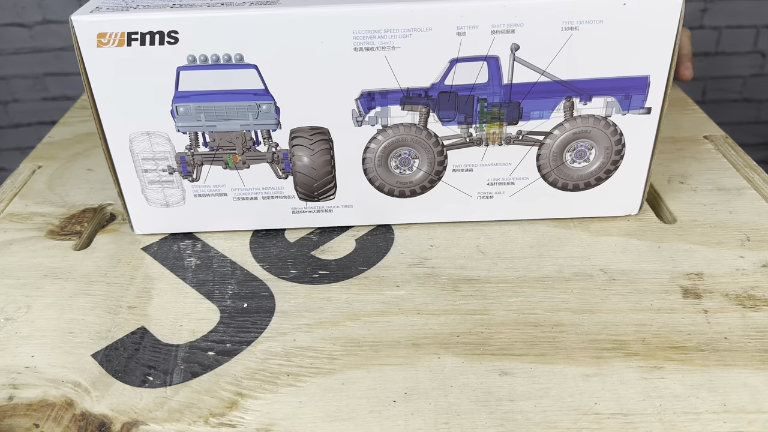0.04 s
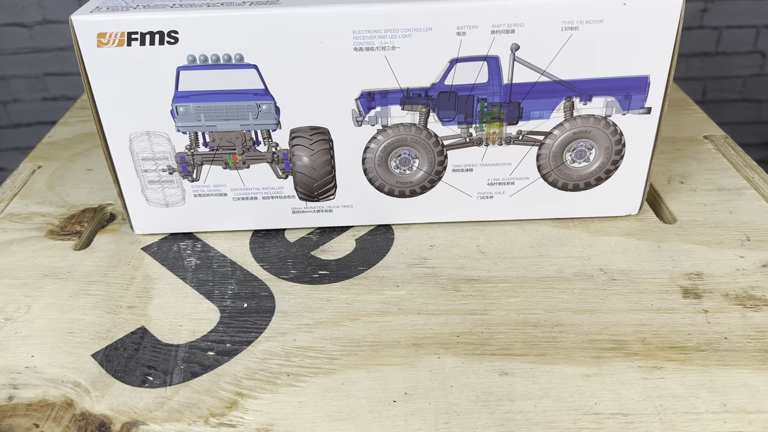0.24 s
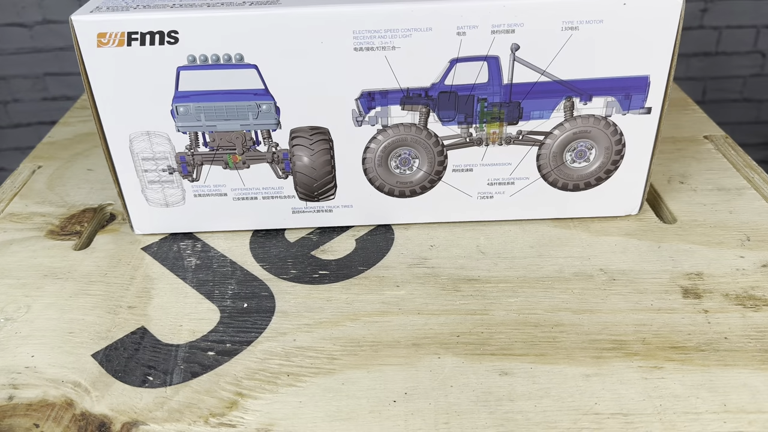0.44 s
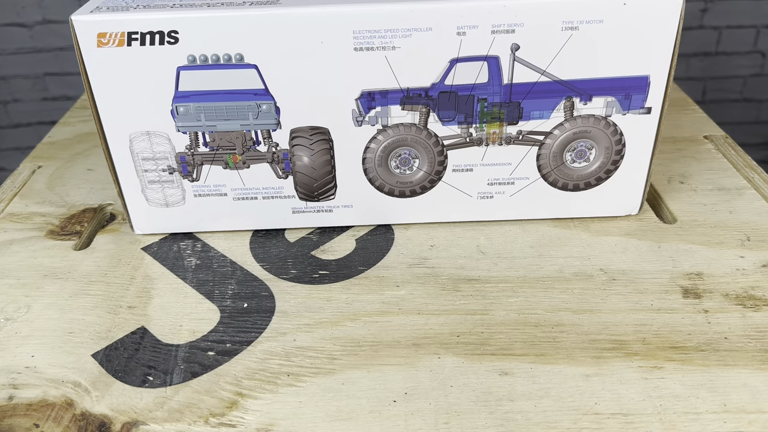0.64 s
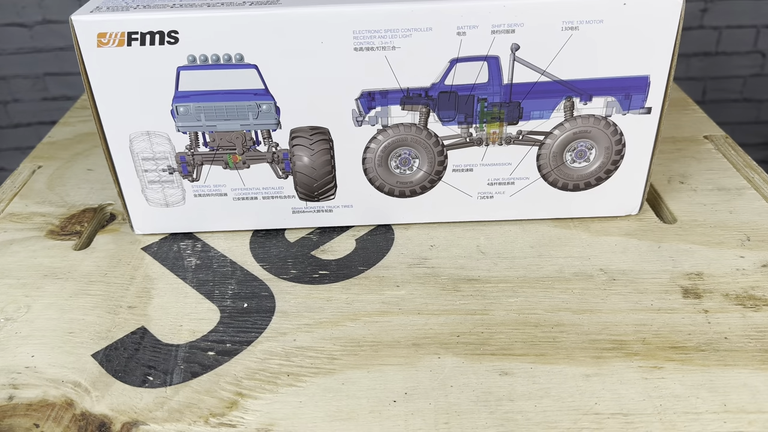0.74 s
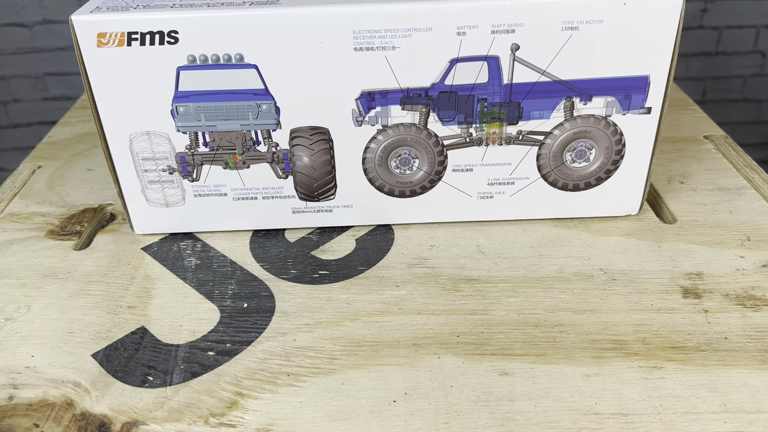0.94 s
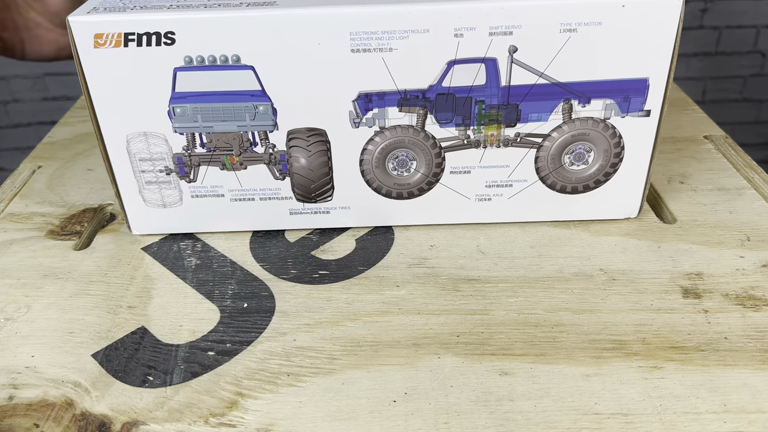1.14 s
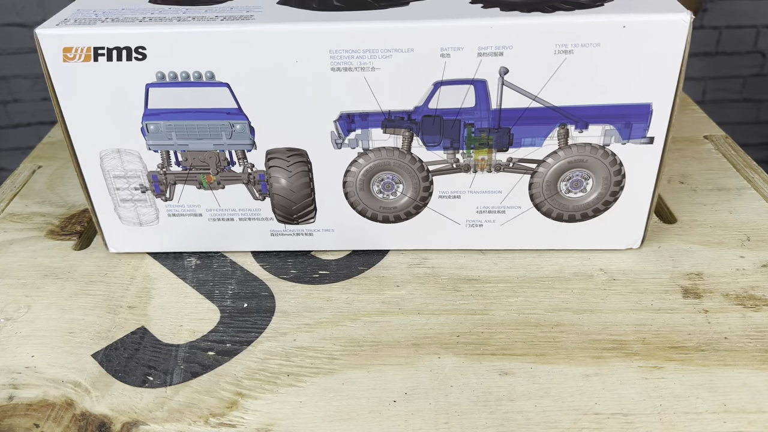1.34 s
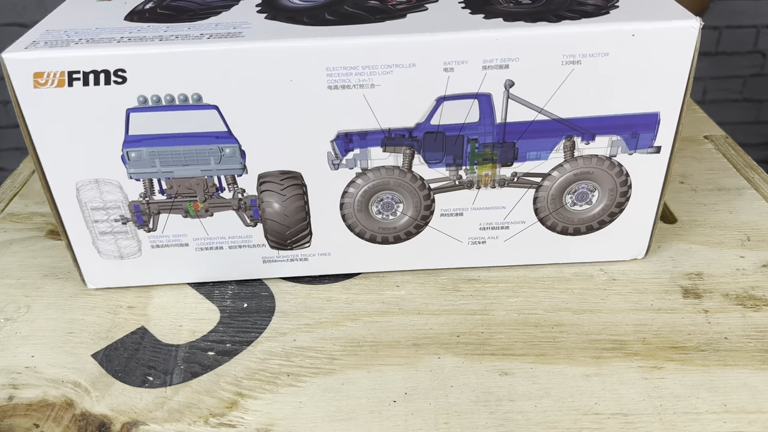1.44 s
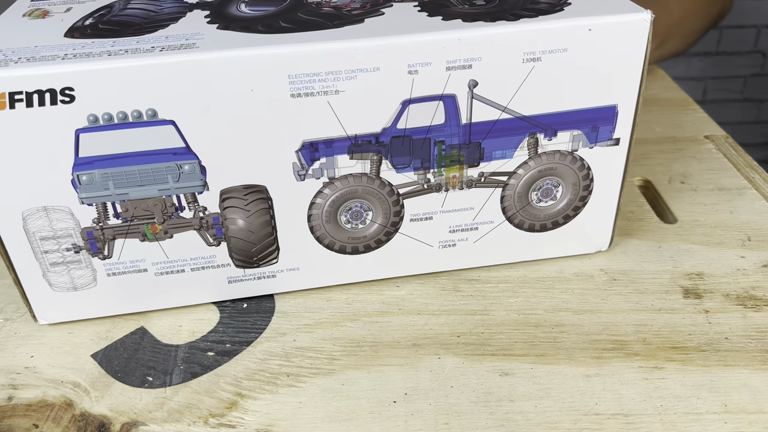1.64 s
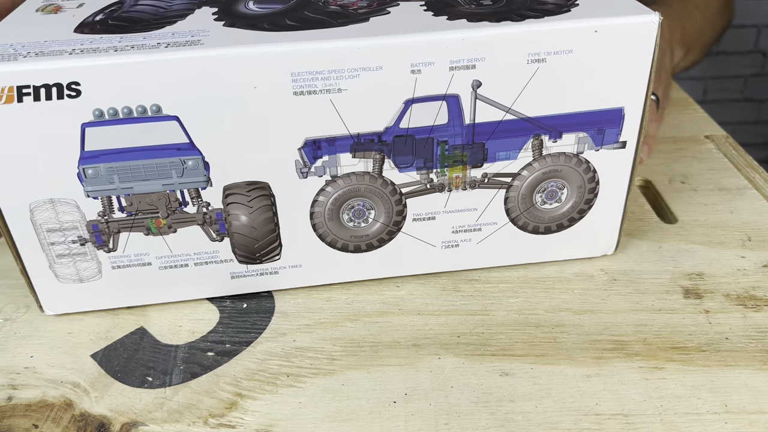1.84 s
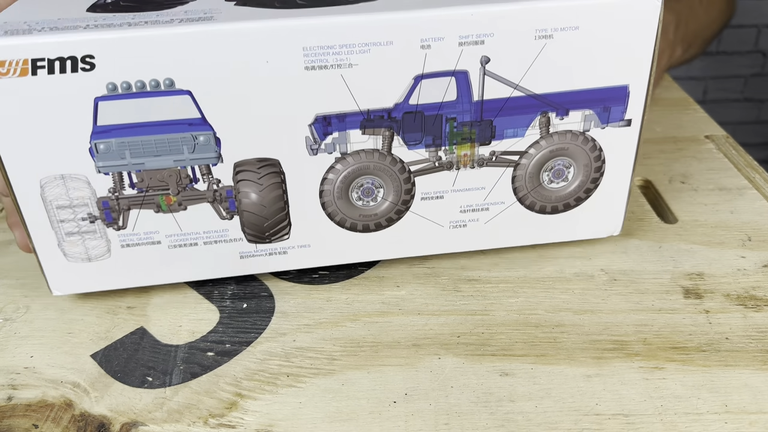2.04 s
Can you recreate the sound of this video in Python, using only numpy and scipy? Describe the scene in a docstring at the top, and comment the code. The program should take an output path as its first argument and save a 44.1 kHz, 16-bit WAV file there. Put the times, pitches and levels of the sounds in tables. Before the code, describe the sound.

Cardboard box dragged over a wooden table, with hollow thuds, papery hiss and dry crackles.

```python
"""A hollow cardboard box on a wooden table in a quiet room, close to the microphone: fingers shift on it,
a hand swishes over its smooth face, then it is dragged in four short pulls. Friction slips and knocks ring
its wall modes, soft thumps of an edge ring single resonances, and coloured grains, noise and short snaps
make its paper skin hiss and crackle. The table rocks with a deep rumble of filtered noise.
Faint thin whistles, gliding sines of unsteady strength, sound in the hush before the first pull."""
import sys
import numpy as np
from scipy import signal
from scipy.fft import rfft, irfft
from scipy.io import wavfile

SR = 44100
rng = np.random.default_rng(int(sys.argv[2]) if len(sys.argv) > 2 else 0)


def elevation(decibels):
    """Turn decibel levels (scalar or array-like) into linear amplitude ratios."""
    levels = np.asarray(decibels, float)
    return 10 ** (levels / 20)


def transcribe(u):
    """Save the signal u as a 16-bit wav file named by the first command-line argument.

    u: samples, shape (n,) or (channels, n), limited to [-1, 1]; the rate is SR.
    q: integer samples, one column per channel.
    """
    v = np.clip(np.atleast_2d(u).T, -1, 1)
    q = np.round(v * 32767).astype(np.int16)
    wavfile.write(sys.argv[1], SR, q)


N = 92257  # length in samples
MOVES_S = 0.81  # the resonances change from the resting to the moving box; the hand comes in

# Wall modes of the moving box. Each row: pitch in Hz, relative level in dB, ring time t60 in s.
BOX_MODES = [(344, -6.5, 0.052), (490, -6, 0.038), (555, -5.5, 0.045), (650, 0, 0.04), (799, -2, 0.021),
             (1020, -1.5, 0.018), (1226, -3, 0.019), (1414, -1.5, 0.014), (1593, -3.5, 0.011),
             (1914, -6.5, 0.019), (2160, -16, 0.041), (2470, -18, 0.0071)]
# Wall modes of the box at rest. Each row: pitch in Hz, relative level in dB, ring time t60 in s.
REST_BOX_MODES = [(638, 0, 0.065), (714, -3, 0.06), (749, -1, 0.076), (854, -0.5, 0.062), (1100, 3, 0.016),
                  (1415, -0.5, 0.026), (1950, -9, 0.028), (2575, -7.5, 0.048)]


def rms_one(x):
    """Scales a signal to rms 1."""
    return x / np.sqrt(np.mean(x ** 2) + 1e-20)


def in_time(rows):
    """Draws each column of a table as a curve over time; the first column is seconds."""
    seconds, *columns = np.transpose(rows)
    return [np.interp(np.arange(N) / SR, seconds, c) for c in columns]


def drift(rate_hz):
    """Smooth random curve of rms 1: noise through a two-pole lowpass at rate_hz."""
    r = np.exp(-2 * np.pi * rate_hz / SR)
    noise = rng.standard_normal(N + SR)
    return rms_one(signal.lfilter([1], [1, -2 * r, r * r], noise)[SR:])  # the first second settles the filter


def ring(clicks, hz, t60):
    """A damped resonance: a unit click sets a sine of height 1 ringing, down 60 dB after t60 seconds."""
    r = elevation(-60 / (t60 * SR))
    w = 2 * np.pi * hz / SR
    return signal.lfilter([0, np.sin(w)], [1, -2 * r * np.cos(w), r * r], clicks + 1e-18)


def modes(x, table):
    """One excitation into all modes, each with a wandering share as contact moves along the walls; rms 1."""
    wander_db, wander_hz = 2.2, 6.3
    total = 0
    for k, (hz, db, t60) in enumerate(table):
        share = elevation(db + wander_db * drift(wander_hz))
        total = total + share * ring(x, hz, t60) * (-1) ** k  # neighbours in opposite phase
    return rms_one(total)


def band(x, low_hz, high_hz):
    """Passes the band between two frequencies."""
    return signal.sosfilt(signal.butter(2, [low_hz, high_hz], "band", fs=SR, output="sos"), x)


def colour(x, spectrum):
    """Gives white input the spectrum of a table of Hz and dB per Hz; rms 1."""
    hz, db = np.transpose(spectrum)
    f = np.maximum(np.arange(N // 2 + 1) * SR / N, 1)
    gain = elevation(np.interp(np.log(f), np.log(hz), db))
    return rms_one(irfft(rfft(x) * gain, N))


def random_signs():
    """A random sign for each sample."""
    return rng.choice([-1, 1], N)


def grains(per_s, spread_db, clump_db):
    """Random clicks of uneven size, larger and smaller in clumps; rms 1."""
    size_db = spread_db * np.minimum(rng.exponential(1, N), 5) + clump_db * drift(57.4)
    sizes = elevation(size_db) * random_signs()
    return rms_one(sizes * (rng.random(N) < per_s / SR))


def click(s, db):
    """A single-sample click."""
    out = np.zeros(N)
    out[int(s * SR)] = elevation(db)
    return out


def scraping():
    """Friction slips ring the wall modes and drive a low boom of air and table."""
    # Scraping of the box walls. Each row: time in seconds, level in dB before trim.
    drag = [(0.0, -65), (0.038, -71.5), (0.244, -69), (0.254, -61.5), (0.32, -81), (0.358, -113),
            (0.362, -53.5), (0.476, -71), (0.48, -63.5), (0.564, -64.5), (0.611, -61), (0.616, -58.5),
            (0.652, -64), (0.674, -62), (0.734, -81), (0.926, -92), (0.99, -90), (0.992, -51), (0.996, -68),
            (1.04, -65.5), (1.064, -69), (1.08, -51.5), (1.092, -57), (1.124, -37.5), (1.17, -77),
            (1.176, -95), (1.18, -47), (1.192, -48), (1.232, -31.5), (1.25, -37), (1.27, -31.5),
            (1.286, -40.5), (1.304, -28), (1.318, -44), (1.328, -38.5), (1.39, -52), (1.49, -35.5),
            (1.514, -33), (1.57, -31), (1.618, -59), (1.654, -40), (1.806, -56), (1.832, -74.5),
            (1.888, -36.5), (1.94, -35), (1.948, -47.5), (1.972, -40.5), (1.992, -49), (2.002, -44.5),
            (2.026, -54.5), (2.09, -50)]
    # Low boom. Each row: time in seconds, level in dB before trim.
    low = [(0.0, -68), (0.068, -64), (0.282, -71.5), (0.33, -93), (0.378, -64.5), (0.458, -73),
           (0.504, -71.5), (0.666, -65.5), (0.734, -85), (0.772, -77.5), (0.932, -86), (0.98, -71),
           (1.0, -57), (1.05, -71), (1.08, -43), (1.13, -47.5), (1.17, -64), (1.2, -40.5), (1.27, -52),
           (1.33, -36.5), (1.4, -64), (1.43, -52), (1.46, -46), (1.576, -41), (1.628, -61.5), (1.666, -40),
           (1.836, -66.5), (1.894, -45.5), (1.944, -40), (1.982, -55), (2.002, -45), (2.022, -64),
           (2.048, -58), (2.074, -64), (2.09, -42)]
    # Air and table resonances while it moves. Each row: pitch in Hz, relative level in dB, t60 in s.
    boom_modes = [(83.5, 0, 0.07), (110, -3.5, 0.089), (160, -1.5, 0.051), (228, -2, 0.077),
                  (268.8, -8, 0.15)]
    # Low resonances with the box at rest. Each row: pitch in Hz, relative level in dB, t60 in s.
    rest_boom_modes = [(91, -10, 0.075), (127, -13, 0.039), (183.5, 0, 0.21), (239, -1, 0.21),
                       (372, -4, 0.17)]
    scrape_trim_db, boom_trim_db, rough_db = 0.7, 2, -9
    (drag_db,), (boom_db,) = in_time(drag), in_time(low)
    moving = np.arange(N) > MOVES_S * SR

    moving_slips = grains(per_s=3500, spread_db=3.5, clump_db=2.0)
    rest_slips = grains(per_s=4000, spread_db=4, clump_db=1.3)
    slips = np.where(moving, moving_slips, rest_slips)

    rough = elevation(rough_db) * rms_one(band(slips * random_signs(), 170, 2590))
    walls = np.where(moving, modes(slips, BOX_MODES), modes(slips, REST_BOX_MODES)) + rough
    # the slips run backwards here, so that the boom has its own fine pattern
    boom_slips = slips[::-1]
    boom = np.where(moving, modes(boom_slips, boom_modes), modes(boom_slips, rest_boom_modes))
    return elevation(drag_db + scrape_trim_db) * walls + elevation(boom_db + boom_trim_db) * boom


def knocks():
    """Short taps ring the wall modes, each mode by chance stronger or weaker; harder taps reach higher."""
    # Knocks on the walls. Each row: start in seconds, level in dB before trim, hardness in Hz.
    knock_rows = [(0.246, -61, 1600), (0.3631, -49, 890), (0.3715, -42.5, 1090), (.414, -46.5, 2520),
                  (0.482, -40, 800), (0.613, -32.5, 890), (0.627, -39, 800), (0.666, -53, 2500),
                  (1.01, -44, 1800), (1.018, -51, 1800), (1.078, -26, 805), (1.1803, -29, 3050),
                  (1.3009, -13.5, 1360), (1.3052, -20, 1300), (1.3091, -8.5, 910), (1.5074, -24, 1500),
                  (1.5134, -22.5, 1100), (1.635, -36, 2070), (1.862, -41, 1500), (1.885, -25.5, 1300),
                  (1.936, -15.5, 1190)]
    trim_db, chance_db, contact_s = -8.5, 2.4, 0.00064
    ring_share = 0.6  # of each mode's t60
    soft = np.exp(-1 / (contact_s * SR))
    out = np.zeros(N)
    for s, db, hard_hz in knock_rows:
        tap = signal.lfilter([1 - soft], [1, -soft], click(s, db + trim_db))
        table = BOX_MODES if s > MOVES_S else REST_BOX_MODES
        for hz, mode_db, t60 in table:
            tilt = (hz / 700) ** 2 / (1 + (hz / hard_hz) ** 4)
            level = elevation(mode_db + rng.normal(0, chance_db))
            out += level * tilt * ring(tap, hz, ring_share * t60)
    return out


def thumps():
    """Soft contacts: each sets one resonance ringing, with a rounded start."""
    # Soft bumps. Each row: start in seconds, level in dB before rounding, pitch in Hz, t60 in s.
    bumps = [(0.995, -29, 69, 0.13), (1.071, -19, 89, 0.04), (1.178, -14.5, 28.7, 0.075),
             (1.2583, -5, 677, 0.085), (1.2949, -10.5, 187, 0.042), (1.3003, -9, 228, 0.085),
             (1.318, -24, 229, 0.07), (1.316, -13, 45.6, 0.043), (1.6, -19, 47.7, 0.041),
             (1.887, -19.5, 105, 0.045), (1.917, -22, 60, 0.064), (2.048, -22.5, 110, 0.023)]
    rise_s = 0.002
    r = np.exp(-1 / (rise_s * SR))
    rings = sum(ring(click(s, db), hz, t60) for s, db, hz, t60 in bumps)
    return signal.lfilter([1 - r], [1, -r], rings)


def patchy(x):
    """Each band of about a third of an octave of the treble swells and fades on its own; rms 1."""
    swell_db, swell_hz = 2.5, 21.4
    edges = np.geomspace(3000, 17000, num=9)
    total = 0
    for k, (low_hz, high_hz) in enumerate(zip(edges, edges[1:])):
        total = total + elevation(swell_db * drift(swell_hz)) * band(x, low_hz, high_hz) * (-1) ** k
    return rms_one(total)


def skin():
    """Fine grains of rubbed paper, giving way to smooth noise while the hand swishes over the face."""
    # Friction hiss. Each row: time in seconds, upper and lower treble level in dB, both before trim.
    hiss = [(0.0, -70, -71), (0.042, -77.5, -74.5), (0.256, -72, -72), (0.282, -78, -101),
            (0.362, -97, -100), (0.367, -67, -82), (0.373, -63, -63.5), (0.423, -69, -56),
            (0.467, -74.5, -67.5), (0.565, -67, -63.5), (0.601, -72.5, -93), (0.631, -60, -62),
            (0.659, -67.5, -77), (0.673, -63.5, -57.5), (0.775, -84, -90), (0.929, -84, -84),
            (0.989, -76, -66), (0.992, -77, -90), (0.995, -58.5, -54), (1.003, -46.5, -54),
            (1.033, -45, -63), (1.083, -43, -46), (1.145, -51.5, -51), (1.171, -55, -62), (1.176, -55, -68),
            (1.18, -57, -43.5), (1.19, -58, -54), (1.206, -48.5, -52), (1.266, -41.5, -44.5),
            (1.41, -49, -49), (1.508, -45, -47), (1.514, -50, -42), (1.526, -41.5, -52),
            (1.546, -36.5, -46), (1.608, -51.5, -51.5), (1.656, -49, -51.5), (1.794, -55, -54),
            (1.838, -78, -71), (1.894, -46, -44), (1.934, -43, -45), (1.978, -59, -59), (2.044, -48.5, -49),
            (2.09, -52, -50.5)]
    # Spectrum of the rubbed paper. Each row: frequency in Hz, relative level in dB per Hz.
    drag_spectrum = [(2650, -39), (4500, -6), (7540, -4), (9260, -9), (10600, -10.5), (14800, -16),
                     (15900, -1)]
    # Spectrum of the hand over the face. Each row: frequency in Hz, relative level in dB per Hz.
    swish_spectrum = [(2650, -30), (4500, -7.5), (5380, 0.5), (6270, -5.5), (6820, -1), (12100, -6.5),
                      (15900, -0.5)]
    upper_trim_db, lower_trim_db = 0.43, -3.5
    swish_ends_s = 1.13
    upper_db, lower_db = in_time(hiss)
    hand_times = [MOVES_S, MOVES_S + 0.045, swish_ends_s, swish_ends_s + 0.031]
    hand = np.interp(np.arange(N) / SR, hand_times, [0, 1, 1, 0])

    fine = grains(per_s=12000, spread_db=2.5, clump_db=1)
    swish = colour(rng.standard_normal(N), swish_spectrum)
    upper = np.sqrt(1 - hand) * colour(fine, drag_spectrum) + np.sqrt(hand) * swish
    lower = rms_one(band(fine * random_signs(), 1500, 4500))
    return elevation(upper_db + upper_trim_db) * patchy(upper) + elevation(lower_db + lower_trim_db) * lower


def snaps():
    """Dry snaps of the paper skin: four close, quickly dying rings from one click."""
    # Snaps. Each row: start in seconds, level in dB before trim, main pitch in Hz.
    snap_rows = [(1.1797, -28.5, 5800), (1.271, -23, 6160), (1.3016, -23, 4450), (1.515, -13, 10150),
                 (1.534, -20, 7000), (1.544, -21, 5960), (1.5634, -17.5, 7260), (1.683, -28, 5940),
                 (1.9372, -21, 6800)]
    trim_db, t60_s = -13.5, 0.004
    out = np.zeros(N)
    for s, db, hz in snap_rows:
        for ratio in (0.74, 0.93, 1, 1.08):
            out += ring(click(s, db + trim_db), hz * ratio, t60_s)
    return out


def whistles():
    """Gliding tones, blurred by a random wobble of their strength; each swells and stops."""
    # Faint whistles. Each row: start and end in seconds, first and last pitch in Hz,
    # level in dB that the swell reaches (before wobble and end fade), wobble rate in Hz.
    whistle_rows = [(0.698, 0.77, 9250, 9450, -81, 30), (0.72, 0.765, 4020, 3960, -80, 60),
                    (0.795, 0.9, 3950, 3850, -82, 150), (0.78, 0.995, 1950, 2050, -76, 500),
                    (0.915, 0.995, 3650, 4280, -80, 120), (0.953, 0.995, 7450, 8480, -74, 30),
                    (0.95, 0.99, 9900, 11400, -81, 40)]
    swell_db, fade_s = 5, 0.006
    t = np.arange(N) / SR
    out = np.zeros(N)
    for start, end, from_hz, to_hz, db, wobble_hz in whistle_rows:
        u = np.clip((t - start) / (end - start), 0, 1)
        edge = np.clip(np.minimum(t - start, end - t) / fade_s, 0, 1)
        pitch = from_hz + (to_hz - from_hz) * np.sin(np.pi / 2 * u)  # the glide slows to its end
        phase = 2 * np.pi * np.cumsum(pitch) / SR
        tone = (1.5 + drift(wobble_hz)) * np.sin(phase) + drift(wobble_hz) * np.cos(phase)
        out += elevation(db - swell_db * (1 - u)) * edge * tone / 2
    return out


def rocking():
    """Sub-bass sway of the table: noise kept to a few Hz, rising and falling in level."""
    # Rocking of the table. Each row: time in seconds, level in dB before trim.
    sway = [(0.0, -51), (0.02, -55), (0.55, -48), (1.06, -48.5), (1.12, -20), (1.19, -65), (1.23, -20),
            (1.33, -29.5), (1.37, -32), (1.41, -25), (1.44, -29), (1.78, -22), (1.82, -33.5), (1.94, -18),
            (1.98, -29), (2.09, -21)]
    trim_db = -6
    level_db, = in_time(sway)
    lowpass = signal.butter(2, 6.3, fs=SR, output="sos")
    highpass = signal.butter(1, 3.0, "high", fs=SR, output="sos")
    noise = rng.standard_normal(N + SR)
    rumble = signal.sosfilt(np.vstack([lowpass, highpass]), noise)[SR:]
    return elevation(level_db + trim_db) * rms_one(rumble)


def room(x):
    """A diffuse tail of dying noise, band-limited, from 4 ms after the direct sound."""
    t60_s = 0.12
    t = np.arange(int(0.4 * SR)) / SR
    tail = band(rng.standard_normal(len(t)), 158, 14000) * elevation(-60 * t / t60_s) * (t > 0.004)
    return signal.fftconvolve(x, tail / np.sqrt(np.sum(tail ** 2)))[:N]


def room_tone():
    """Steady coloured noise of the quiet room."""
    # Spectrum of the room. Each row: frequency in Hz, relative level in dB per Hz.
    tone_spectrum = [(16, -27), (28, -1), (145, -17.5), (928, -31), (1060, -32), (3990, -35.5),
                     (5210, -39.5), (15900, -40)]
    return elevation(-65.5) * colour(rng.standard_normal(N), tone_spectrum)


def scene():
    """Box, skin, thumps and whistles with their room tail, over rocking and room tone; one channel."""
    wet_db = -18
    near = scraping() + knocks() + thumps() + skin() + snaps() + whistles()
    return (near + elevation(wet_db) * room(near) + rocking() + room_tone())[None]


def top_cut(x):
    """Nothing passes above the cut-off."""
    return signal.sosfilt(signal.butter(12, 16010, fs=SR, output="sos"), x)


def record(dry):
    """A steep lowpass takes away the top of the treble, 60 dB down from 16150 Hz."""
    lowpass = signal.cheby2(12, 60, 16150, fs=SR, output="sos")
    finished = signal.sosfilt(lowpass, dry)
    return top_cut(finished)


dry = scene()
out = record(dry)
transcribe(out)
```